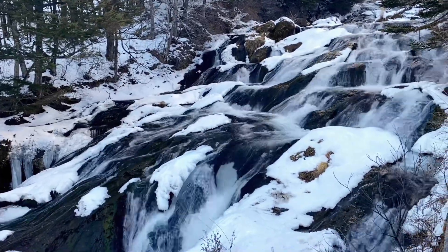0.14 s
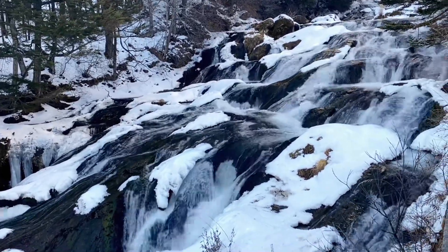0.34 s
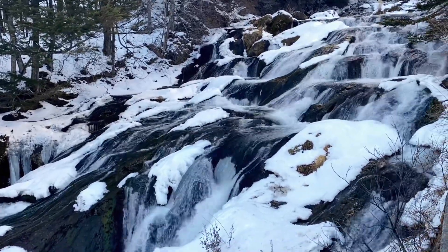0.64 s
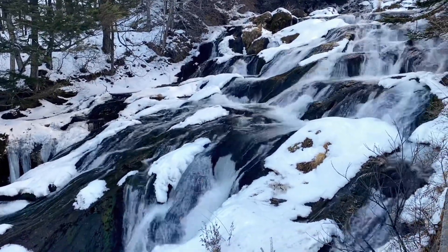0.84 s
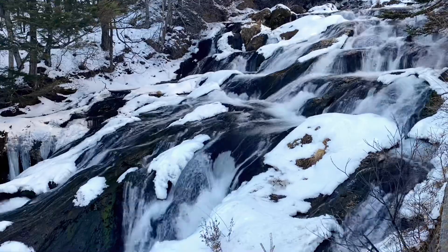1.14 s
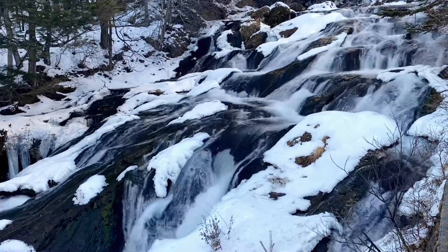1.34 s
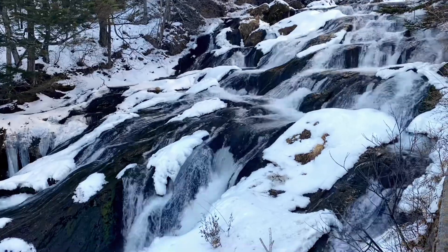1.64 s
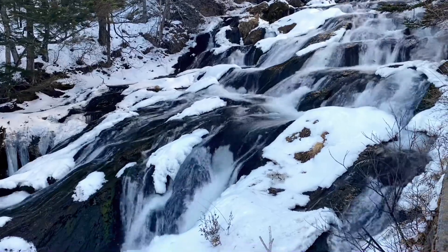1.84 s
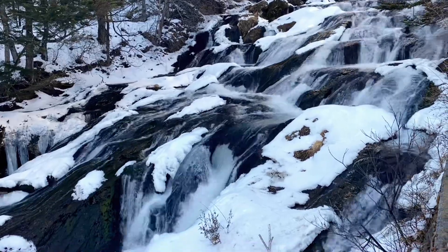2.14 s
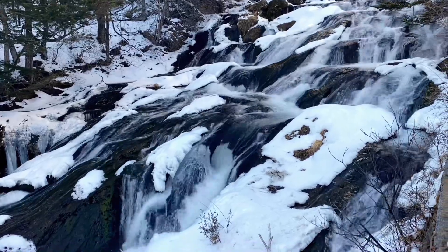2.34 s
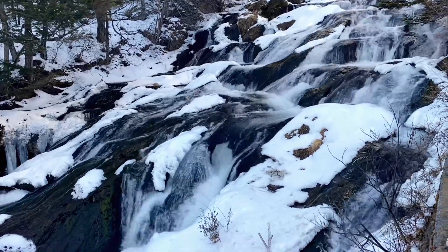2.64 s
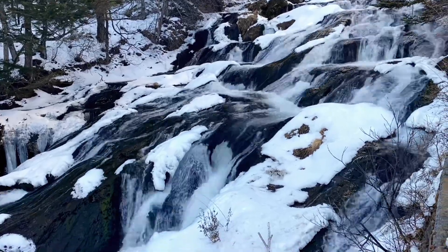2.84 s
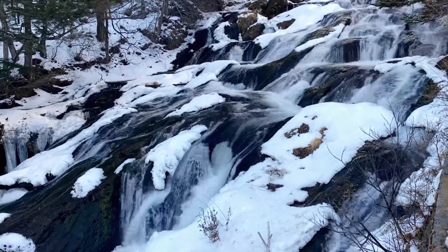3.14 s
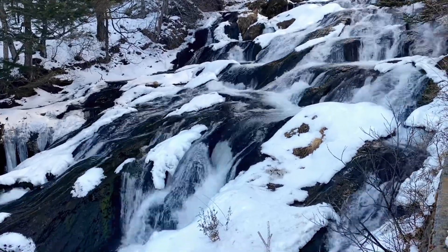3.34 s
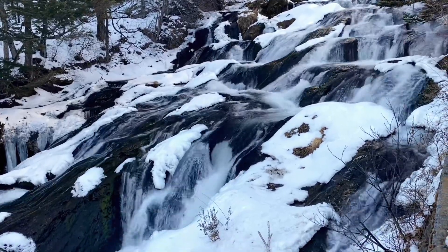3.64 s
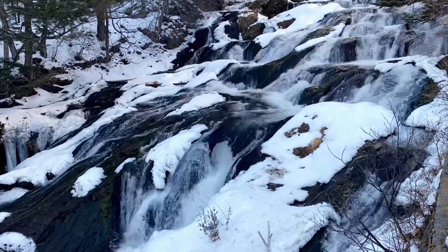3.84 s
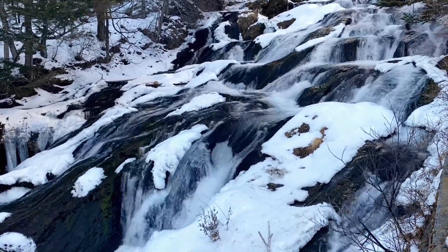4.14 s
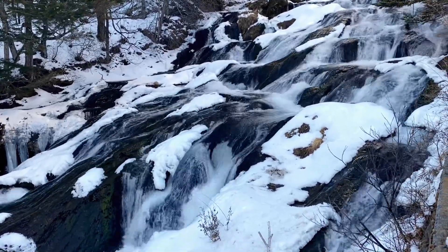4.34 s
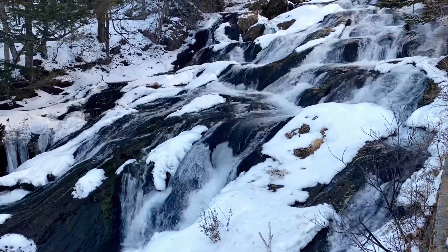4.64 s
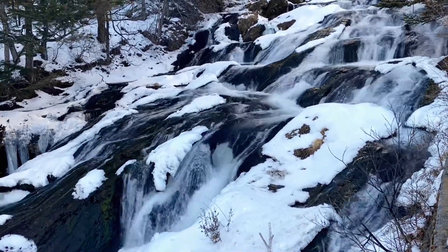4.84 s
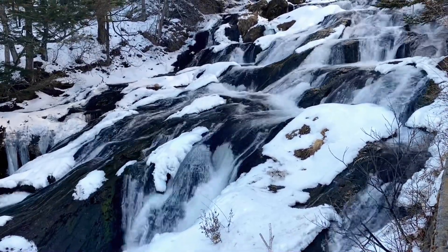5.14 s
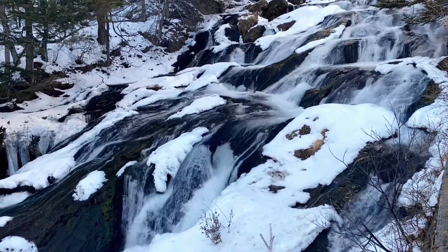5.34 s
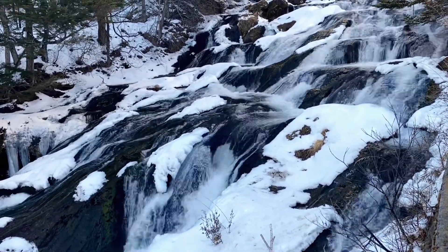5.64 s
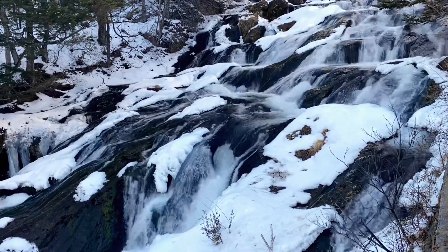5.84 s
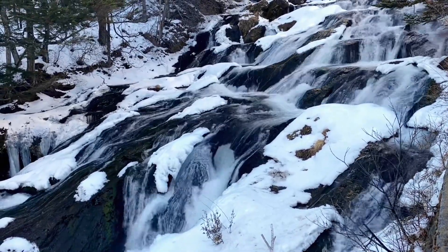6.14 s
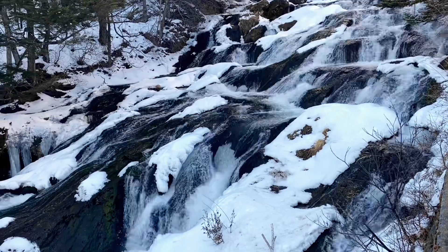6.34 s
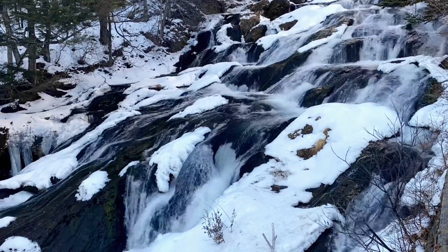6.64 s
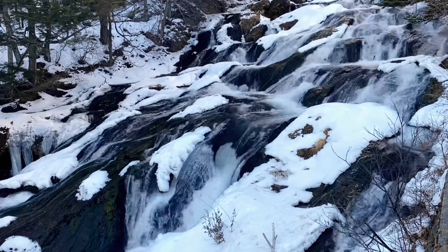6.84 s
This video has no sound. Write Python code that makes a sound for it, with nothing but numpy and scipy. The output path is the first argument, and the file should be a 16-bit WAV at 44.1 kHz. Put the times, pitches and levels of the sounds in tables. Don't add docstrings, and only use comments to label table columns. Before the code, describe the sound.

Constant rushing cascade with a low hum, lively high bird chirps over distant twittering, and a harsh, rattling crow cawing about once a second.

```python
import sys
import numpy as np
from scipy import signal
from scipy.fft import rfft, irfft
from scipy.io import wavfile
from scipy.ndimage import uniform_filter1d

SR = 44100
rng = np.random.default_rng(int(sys.argv[2]) if len(sys.argv) > 2 else 0)


def store_wav(level_fs):
    pcm = np.round(np.clip(np.atleast_2d(level_fs), -1, 1) * 32767)
    wavfile.write(sys.argv[1], SR, pcm.T.astype(np.int16))


def voltage_ratio(decibels):
    exponent = np.asarray(decibels, float) / 20
    return 10 ** exponent


N = 307377

# f/Hz, density/dB per Hz
WATER_SPECTRUM = [(24, -53), (45, -31), (62, -23.5), (82, -5.5), (117, -1), (202, -3), (253, -7.5),
                  (407, -9), (480, -12), (973, -13), (1500, -17.5), (3000, -15), (6500, -26.5),
                  (15600, -31), (15900, -90)]
# f/Hz, likeness/1
WATER_LIKENESS = [(60, 0.39), (130, 0.86), (290, 0.51), (640, 0.52), (1400, 0.62), (3100, 0.71),
                  (6800, 0.16), (15000, 0.056)]
# f/Hz, left minus right/dB
WATER_LEAN = [(60, 0.5), (240, 1.5), (950, 3), (3770, 0.5), (15000, -0.5)]
# f/Hz, level/dB
HOLLOWS = [
    (113, -40.5),
    (300, -43.5),
    (399, -44),
]

LEFT_CALLS = {"swoop": [(5.062, .09, 4460, 6080, -24)], "climb": [(1.712, .052, 5000, 6940, -35),
              (5.215, 0.071, 3300, 3590, -20.5)], "arch": [(4.837, 0.012, 2880, 3700, -17),
              (3.6, .05, 3600, 2900, -31.5), (.915, .03, 3900, 4300, -23.5)],
              "glide": [(.868, 0.0081, 4000, 4000, -18), (1.105, 0.035, 2750, 3030, -33),
              (1.279, 0.076, 3000, 3470, -30), (2.325, 0.029, 3300, 3850, -31),
              (2.728, 0.037, 3630, 3600, -31), (3.043, .039, 5810, 6170, -36),
              (3.315, 0.0085, 4240, 4370, -28), (3.794, 0.04, 3550, 3630, -26),
              (3.874, 0.058, 5360, 6360, -29), (5.763, .059, 3390, 3550, -29.5),
              (5.863, 0.0099, 4440, 4500, -27), (6.42, 0.057, 5500, 6660, -38),
              (6.54, 0.049, 3000, 3520, -35)]}
LEFTMOST_CALLS = {"cheep": [(.04, 0.15, 3420, 6680, -28), (.243, .129, 4280, 6680, -27.5),
                  (.768, .097, 4160, 5580, -27), (5.715, 0.11, 5400, 6860, -31)],
                  "climb": [(.385, 0.21, 3450, 7020, -29)], "arch": [(.089, 0.11, 3900, 4300, -29),
                  (.922, 0.071, 3580, 3920, -30), (2.569, 0.13, 3800, 4110, -32),
                  (4.823, 0.018, 2920, 3720, -22)], "glide": [(.224, 0.047, 3450, 2900, -25),
                  (5.568, .024, 7460, 2960, -34), (.448, 0.036, 3610, 5130, -24),
                  (.524, 0.082, 3640, 3870, -32), (.894, .008, 3980, 3980, -22),
                  (1.083, .094, 4390, 3980, -28.5), (1.763, 0.019, 3460, 3530, -34),
                  (2.164, 0.057, 3360, 3400, -29.5), (3.12, .042, 3280, 3550, -37),
                  (3.269, .007, 4080, 4890, -25), (3.404, 0.064, 5000, 6460, -30),
                  (4.31, 0.07, 2900, 3730, -30), (4.808, 0.021, 2610, 3440, -21),
                  (5.566, 0.038, 4560, 4120, -31), (5.61, 0.035, 4100, 4130, -31)]}
AHEAD_CALLS = {"cheep": [(4.042, 0.039, 3720, 4810, -22)], "climb": [(3.325, .113, 4070, 4680, -28.5)],
               "swoop": [(3.468, .086, 3420, 4980, -23.5), (4.263, 0.075, 4880, 5490, -22.5),
               (4.628, .083, 4020, 4840, -20), (5.973, .155, 4380, 6340, -27.5)],
               "arch": [(.49, 0.085, 4200, 1850, -31.5), (2.446, 0.055, 3440, 3580, -22),
               (3.675, 0.036, 3260, 4710, -24.5)], "glide": [(1.563, 0.056, 3640, 4300, -21),
               (1.62, .02, 4320, 3700, -24.5), (4.474, 0.0138, 4630, 3110, -27),
               (2.798, 0.17, 4440, 6870, -35.5), (4.402, 0.091, 2220, 4650, -23),
               (3.438, 0.11, 4580, 6700, -22), (3.615, .1, 3530, 4670, -25.5),
               (3.758, 0.039, 3870, 4730, -23.5), (3.878, 0.079, 3920, 5430, -19),
               (4.858, 0.11, 4440, 6650, -29), (5.436, 0.03, 4380, 6120, -39),
               (6.36, 0.27, 3510, 4130, -39), (6.724, 0.092, 4280, 6860, -36),
               (6.808, 0.19, 3940, 3550, -36), (6.858, .1, 5780, 5500, -40)]}
RIGHT_CALLS = {"cheep": [(.902, 0.12, 3740, 6200, -23.5), (1.335, .124, 4050, 6700, -30.5),
               (1.796, .152, 4270, 6050, -19), (2.129, .122, 4240, 6270, -22.5),
               (3.85, .117, 3140, 6370, -21)], "arch": [(.673, 0.07, 3590, 3680, -32)],
               "glide": [(1.704, .008, 4100, 3500, -37), (4.728, 0.11, 5100, 6180, -22.5),
               (4.83, 0.033, 6150, 3760, -31), (4.868, 0.018, 3880, 2620, -22.5),
               (2.51, .026, 4000, 4210, -42), (3.42, 0.025, 3390, 4820, -25.5),
               (4.519, 0.028, 4400, 4870, -31), (4.905, .16, 3660, 4150, -27.5),
               (5.072, 0.0253, 3960, 3100, -21.5), (6.169, 0.025, 3950, 3220, -35),
               (6.198, 0.1, 3780, 2660, -28)]}
PERCH_PAN_DB = [4, 5, 2, -5]
# f/Hz, level/dB
SYRINX = [(2000, -5.5), (3300, -1.5), (4200, -0.5), (5000, -2.5), (6000, -6), (6900, -11)]
FALLS = {"cheep": (165000, 2350, 1.6, -8), "swoop": (52000, 2300, 1.3, -9)}

# start t/s, end t/s, opening voice level/dB, closing voice level/dB, upper partials level/dB
CAWS = [
    (1.85, 2.305, -17.5, -15.5, -1),
    (2.7, 3.168, -17.5, -14.5, -3),
    (3.655, 4.115, -16.5, -15, -1),
    (4.58, 5.065, -17, -14.5, -3),
    (5.61, 6.1, -17.5, -16.5, 0),
    (6.615, 7.08, -16, -14.5, -6.5),
]
# share of caw/1, main partial f/Hz, effort level/dB, rattle rate/Hz
OPENING_VOICE = [(0, 1100, -14, 70), (.05, 1250, -7, 70), (.075, 1120, -7, 70), (.12, 1180, 0, 72),
                 (.24, 1300, -3, 105), (.38, 1310, -2, 115), (.5, 1255, -4, 115), (.57, 1230, -30, 110)]
# share of caw/1, main partial f/Hz, effort level/dB, rattle rate/Hz
CLOSING_VOICE = [(.36, 1340, -30, 60), (.48, 1310, -2, 57), (.7, 1250, 0, 53), (.92, 1195, -1, 44),
                 (.98, 1100, -5, 41), (1.0, 1060, -16, 40)]
# f/Hz, level/dB
THROAT = [(900, -9), (1150, -1), (1300, 0), (1500, -3), (1780, 0), (2050, -5), (2500, -3), (3200, -12)]

# t/s, level/dB
FLOCK_LEVEL = [(0, -34.5), (.5, -28), (1.0, -31.5), (1.5, -32.5), (2.0, -35.5), (2.5, -35), (3.0, -36.5),
               (3.3, -40.5), (3.6, -24.5), (4.1, -27.5), (4.5, -28.5), (5.0, -27), (5.5, -34), (5.999, -36),
               (6.5, -37.5), (6.97, -36)]
# f/Hz, level/dB
FLOCK_COLOUR = [(1500, -30), (2300, -13), (3200, 0), (4200, 1.5), (5200, -8.5), (6500, -17), (8000, -35)]
# f/Hz, t60 t/s
WOOD_T60 = [(800, 0.18), (1500, 2.57), (3000, 0.19), (6000, 0.43), (10000, 0.6)]


def evened(x):
    return x / np.sqrt(np.mean(x ** 2) + 1e-20)


def read(points, hz):
    f, value = np.transpose(points)
    return np.interp(np.log(hz + 1), np.log(f + 1), value)


def add(mix, start_s, sound, pan_db):
    part = mix[:, round(start_s * SR):][:, :len(sound)]
    gain = voltage_ratio(np.array([[pan_db / 2], [-pan_db / 2]]))
    part += sound[:part.shape[1]] * gain


def wander(size, smooth):
    noise = rng.standard_normal(size + -size % 8000)[:size]
    smoothed = uniform_filter1d(noise, int(smooth))
    return evened(uniform_filter1d(smoothed, int(smooth)))


def resonate(x, hz, width_hz):
    carrier = np.exp(2j * np.pi * np.cumsum(hz * np.ones(x.shape[-1])) / SR)
    r = np.exp(-np.pi * width_hz / SR)
    return 2 * (carrier * signal.lfilter([1 - r], [1, -r], x / carrier)).real


def water(level_db=-26, patchy_db=1.2, flicker_db=.45, swell_db=.25):
    frames, hz = N // 128 + 5, np.fft.rfftfreq(512, 1 / SR)
    a, b, c, d, patches = rng.standard_normal((frames, 257, 5)).T
    patches = uniform_filter1d(patches, size=8, axis=0)
    patches = evened(uniform_filter1d(patches, size=16, axis=1))
    field_db = patchy_db * patches
    field_db = field_db + flicker_db * wander(frames, 8.5) * (hz[:, None] > 2000)
    field_db = field_db + swell_db * wander(frames, 220)
    z = np.array([a + 1j * b, c + 1j * d]) * voltage_ratio(field_db)
    left, other = rfft(signal.istft(z, nperseg=512, noverlap=384)[1][:, :N])

    hz = np.fft.rfftfreq(N, 1 / SR)
    same = np.clip(read(WATER_LIKENESS, hz), 0, 1)
    right = same * left + np.sqrt(1 - same ** 2) * other
    lean_db = read(WATER_LEAN, hz) / 2
    pair = np.array([left * voltage_ratio(lean_db), right * voltage_ratio(-lean_db)])
    return voltage_ratio(level_db) * evened(irfft(pair * voltage_ratio(read(WATER_SPECTRUM, hz)), N))


def hollows(width_hz=13.6):
    hum = 0
    for push, (hz, level_db) in zip(rng.standard_normal((len(HOLLOWS), N)), HOLLOWS):
        ring = resonate(resonate(push, hz, width_hz), hz, width_hz)
        hum = hum + voltage_ratio(level_db - 1.0) * evened(ring)
    return hum


def contour(kind, length_s, first_hz, far_hz):
    scoop_hz, scoop_share, bend = 2300, .11, 1.45
    u = np.arange(0, 1, 1 / SR / length_s)
    if kind == "arch":
        way = np.sin(np.pi * u) ** .55 - .4 * u ** 3
    elif far_hz > first_hz:
        way = 1 - (1 - u) ** bend
    else:
        way = u ** (bend + .5)
    hz = first_hz + (far_hz - first_hz) * way
    fade_db = 0 * u
    if kind in ("cheep", "swoop", "climb"):
        hz = hz - (first_hz - scoop_hz) * np.exp(-u / scoop_share)
    if kind in FALLS:
        speed, bottom_hz, curve, dip_db = FALLS[kind]
        v = np.arange(0, 1, speed / (far_hz - bottom_hz) / SR)
        hz = np.append(hz, far_hz - (far_hz - bottom_hz) * v ** curve)
        fade_db = np.append(fade_db, dip_db * np.sin(np.pi * v))
    return hz, fade_db


def whistle(t, hz, level_db, overtones, waver=.0095, tremble_db=3.4):
    hz = uniform_filter1d(hz, size=220, mode="nearest")
    level_db = level_db + 4 * np.clip(-np.gradient(hz) / 2, 0, 1)
    hz = hz * (1 + waver * wander(len(t), 39))
    phase = 2 * np.pi * np.cumsum(hz) / SR
    tone = np.sin(phase)
    for ratio, overtone_db in overtones:
        tone = tone + voltage_ratio(overtone_db + 4 * wander(len(t), 400)) * np.sin(ratio * phase)
    edge = np.clip(np.minimum(t - t[0], t[-1] - t) / .004, 0, 1)
    return np.sqrt(2) * voltage_ratio(level_db + tremble_db * wander(len(t), 132)) * tone * edge


def songbirds(wide_hz=1500):
    out = np.zeros((2, N))
    perches = [LEFT_CALLS, LEFTMOST_CALLS, AHEAD_CALLS, RIGHT_CALLS]
    for perch, pan_db in zip(perches, PERCH_PAN_DB):
        for kind, rows in perch.items():
            for start_s, length_s, first_hz, far_hz, effort_db in rows:
                hz, fade_db = contour(kind, length_s, first_hz, far_hz)
                wide = abs(far_hz - first_hz) > wide_hz
                overtones = [(2, -25)] if wide else [(3 / 2, -25), (2, -26)]
                level_db = effort_db + fade_db + read(SYRINX, hz)
                add(out, start_s, whistle(np.arange(len(hz)) / SR, hz, level_db, overtones), pan_db)
    return out


def crow_voice(share, table, upper_db, partials, depth, swing):
    at, *columns = np.transpose(table)
    hz, effort_db, rate_hz = (np.interp(share, at, c) for c in columns)
    cycle = np.cumsum(rate_hz * (1 + .05 * wander(len(share), 400))) / SR
    bent_hz = hz * (1 + swing * (cycle % 1 - .5) + .015 * wander(len(share), 40))
    hz = uniform_filter1d(bent_hz, size=60)
    phase = 2 * np.pi * np.cumsum(hz) / SR
    rattle = (1 - depth * np.cos(2 * np.pi * cycle)) * voltage_ratio(wander(len(share), 200))
    main = voltage_ratio(read(THROAT, hz)) * np.sin(phase)
    upper = sum(voltage_ratio(db + read(THROAT, k * hz)) * np.sin(k * phase) for k, db in partials)
    hiss = rng.standard_normal(len(share))
    breath = voltage_ratio(-12) * evened(resonate(resonate(hiss, 1450, 900), 1450, 900))
    return voltage_ratio(effort_db) * rattle * (main + voltage_ratio(upper_db) * upper + breath)


def caw(start_s, end_s, opening_db, closing_db, upper_db):
    share = np.arange(0, 1, 1 / SR / (end_s - start_s))
    # ratio to the main one, level/dB
    opening_partials = [(2 / 3, -16), (4 / 3, -1), (5 / 3, -16)]
    closing_partials = [(3 / 2, -6), (2, -11), (5 / 2, -22)]
    opening = crow_voice(share, OPENING_VOICE, upper_db, opening_partials, depth=.55, swing=.12)
    closing = crow_voice(share, CLOSING_VOICE, upper_db, closing_partials, depth=.45, swing=.22)
    both = voltage_ratio(opening_db) * opening + voltage_ratio(closing_db) * closing
    return both * signal.windows.tukey(len(share), .04)


def crow(pan_db=6.5):
    out = np.zeros((2, N))
    for row in CAWS:
        add(out, row[0], caw(*row), pan_db)
    return out


def flock(count=420):
    out = np.zeros((2, N))
    for when, long, low, arch, turn, loud, side in rng.random((count, 7)):
        t = np.arange(0, .04 + .11 * long, 1 / SR)
        bow = np.sin((1.4 + 1.7 * turn) * (t / t[-1]) ** 1.3)
        hz = (2100 + 1700 * low) * (1 + (0.19 + .7 * arch) * bow)
        call = whistle(t, hz, 7 * loud + read(FLOCK_COLOUR, hz), [])
        add(out, when * N / SR, call, 4 + 6 * (side - .5))
    far = evened(0.92 * out + wood(out))
    return far * voltage_ratio(np.interp(np.arange(N) / SR, *np.transpose(FLOCK_LEVEL)))


def wood(x):
    taps = np.zeros((2, SR))
    slots = np.arange(900, SR - 20, 20)
    at = slots + rng.integers(0, 20, (2, len(slots)))
    np.put_along_axis(taps, at, rng.choice([-1., 1.], at.shape), 1)
    taps = taps + 4.0 * taps[:1]
    hz, t, z = signal.stft(taps, SR, nperseg=256)
    decay = voltage_ratio(-60 * t / read(WOOD_T60, hz)[:, None])
    tail = signal.istft(z * decay, SR, nperseg=256)[1]
    tail = tail / np.linalg.norm(tail, axis=1)[:, None]
    return signal.fftconvolve(x, tail, axes=1)[:, :N]


def scene():
    near, caws = songbirds(), crow()
    echo = wood(voltage_ratio(-4) * near + voltage_ratio(-11) * caws)
    return water() + hollows() + near + caws + flock() + echo


def band_limit(x):
    return signal.sosfilt(signal.butter(12, 15760, fs=SR, output="sos"), x)


def record(dry):
    return band_limit(dry)


dry = scene()
out = record(dry)
store_wav(out)
```